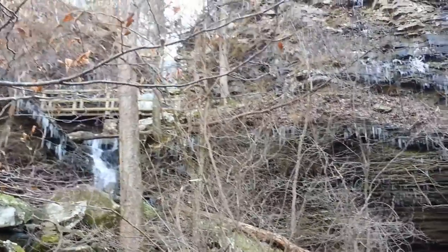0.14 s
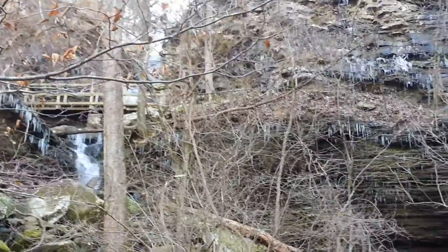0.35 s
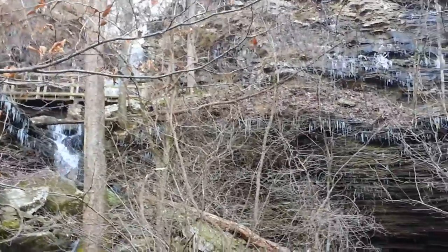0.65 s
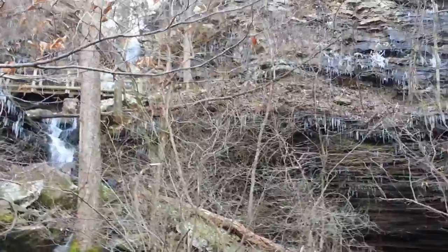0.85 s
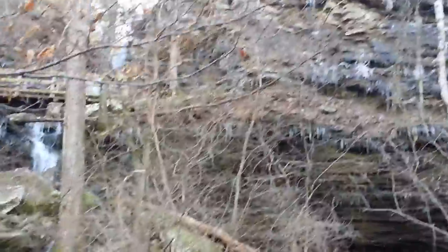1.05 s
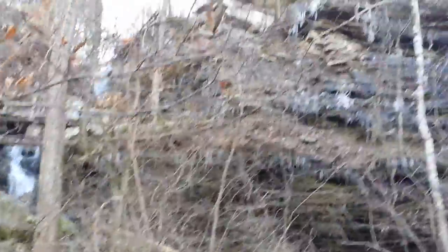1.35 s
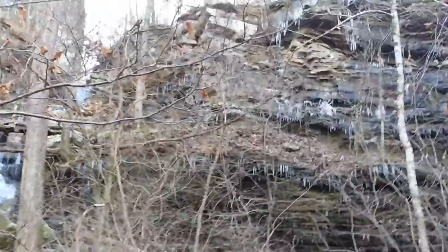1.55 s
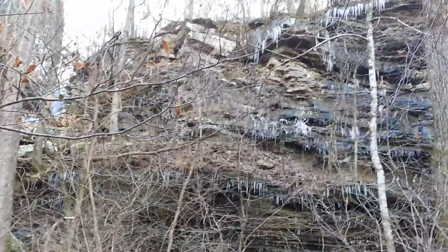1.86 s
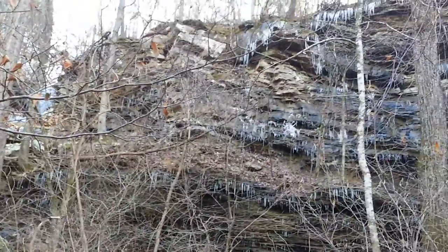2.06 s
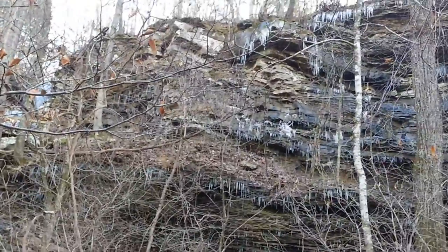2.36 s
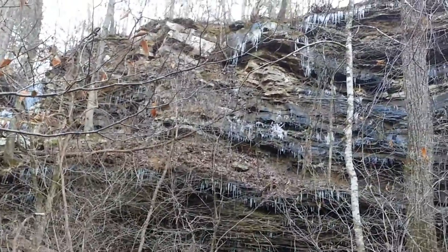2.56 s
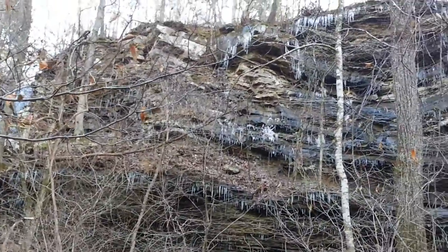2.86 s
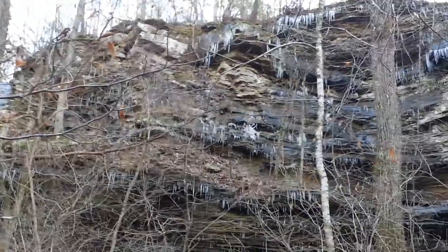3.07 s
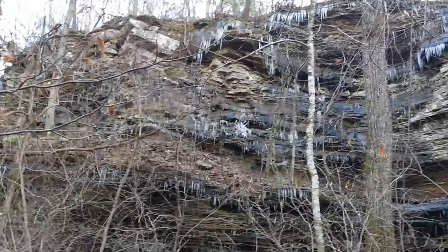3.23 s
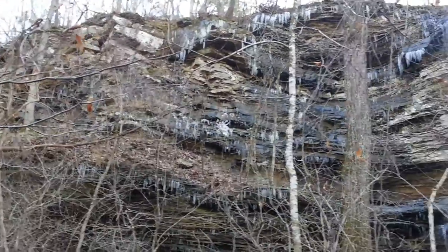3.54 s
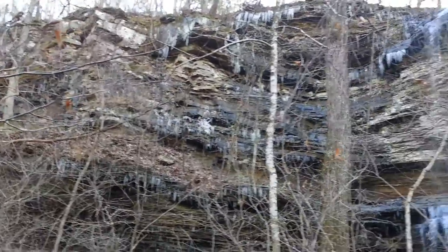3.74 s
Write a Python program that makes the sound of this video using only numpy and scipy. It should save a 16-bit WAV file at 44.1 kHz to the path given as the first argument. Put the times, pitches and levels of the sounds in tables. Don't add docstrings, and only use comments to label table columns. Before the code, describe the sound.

Steady waterfall rush under a rocky wooded bluff, with tiny drip ticks and light breeze thumps.

```python
import sys
import numpy as np
from scipy import signal
from scipy.fft import rfft, irfft, next_fast_len
from scipy.io import wavfile
from scipy.ndimage import uniform_filter1d

SR = 44100
rng = np.random.default_rng(int(sys.argv[2]) if len(sys.argv) > 2 else 0)


def store_pcm(level_fs):
    pcm = np.round(np.clip(level_fs, -1, 1) * 32767).astype(np.int16)
    wavfile.write(sys.argv[1], SR, np.atleast_2d(pcm).T)


def to_linear_factor(level_db):
    exponent = np.asarray(level_db, float) / 20
    return 10 ** exponent


N = 171990
SIZE = next_fast_len(N)
FREQ = np.arange(SIZE // 2 + 1) * SR / SIZE + 1e-3

# freq_hz, level_db (per Hz)
RUSH_TONE = [(55, -43), (120, -10), (200, -4.5), (400, -4.5), (900, -3), (1500, -1), (4000, -6),
             (15000, -14)]
# freq_hz, likeness (-1..1)
PORT_LIKENESS = [(200, 0.88), (650, 0.62), (1080, 0.12), (1460, 0.65), (1860, 0.54), (2130, -0.66),
                 (2500, -0.57), (4200, 0)]
# freq_hz, lead_rad
RIGHT_LEAD = [(0, 0), (700, 0.45), (1100, 2.7), (1400, 4), (2150, 4), (2500, 4), (3100, 6.5), (5000, 37.5)]
# time_s, level_db
BREEZE = [(0, -55), (.14, -47), (.19, -70), (1.45, -72), (1.66, -49), (1.9, -52.5), (2.15, -55),
          (2.35, -62), (2.45, -55), (2.6, -69), (2.75, -58), (3.2, -57.5), (3.4, -60), (3.65, -54),
          (3.9, -60)]
# peak_s, length_s, level_db
THUMPS = [
    (.13, 0.027, -51),
    (1.66, .06, -44.5),
    (1.8, 0.045, -41),
    (2.12, 0.046, -47),
]
# peak_s, length_s, level_db
PUFFS = [
    (.01, .04, -59),
    (.47, .04, -66),
    (.85, .04, -67),
    (1.28, 0.046, -46),
    (1.358, 0.077, -46.5),
    (1.52, 0.094, -48),
    (1.67, 0.067, -48),
    (2.447, 0.048, -48),
    (3.37, .04, -64),
]
WIND_CORNER = [
    [86],
    [60.4],
]
# peak_s, pitch_hz, length_ms, level_db, left_minus_right_db
DRIPS = [(.223, 6300, 1, -38, -3), (.231, 5600, 1, -29, 8), (1.474, 7000, 1, -30, -6),
         (1.487, 5300, 1, -26, 6), (1.683, 7100, 1.8, -29, -4), (1.7057, 5030, 1.3, -20, -2),
         (1.7495, 6900, 1.3, -27, -1), (1.863, 6800, .6, -29, -6), (2.005, 337, 17, -35, 2),
         (2.279, 6800, 1, -34, -6), (2.728, 6800, 1, -33, -6), (3.027, 5200, 1, -27, 6),
         (3.045, 5200, 1, -30, 6)]
# freq_hz, level_db
BODY_SHADE = [
    [(300, -0.5), (1850, 0.5), (2100, -5), (3100, -8.5), (4200, -3.5), (10500, -3), (12500, -13),
     (14400, -5.5)],
    [(300, -1.5), (1850, -0.5), (2100, -2.5), (2600, -5), (3800, -7), (8000, -0.5), (12500, -3.5),
     (14400, -17)],
]
# freq_hz, width_hz, boost_db
PORT_RINGS = [
    (5425, 1460, 13.5),
    (6695, 970, 19.5),
]


def curve(table, hz=FREQ):
    points = np.array(table, float)
    return np.interp(np.log(hz), np.log(points[:, 0]), points[:, 1])


def peak_db(hz, width_hz, db):
    return 10 * np.log10(1 + (to_linear_factor(db) ** 2 - 1) / (1 + (2 * (FREQ - hz) / width_hz) ** 2))


def unit(x):
    return x / np.sqrt(np.mean(x ** 2))


def walk(rate_hz):
    hold = int(SR / rate_hz)
    steps = np.repeat(rng.standard_normal(SIZE // hold + 1), hold)
    smooth = uniform_filter1d(uniform_filter1d(steps, hold), hold)
    return unit(smooth[:SIZE])


def rush():
    swell_db, surge_db, flicker_db = 0.1, 0.15, 0.45
    gurgle_hz = 900
    bubbles_per_cycle, bubble_spread_db, bubble_share = 0.5, 2.5, 0.2
    spectra = 0
    swell = walk(2.2)
    for hz in 40 * 2. ** np.arange(10):
        chance = rng.random((2, SIZE))
        loudness = to_linear_factor(bubble_spread_db * np.minimum(rng.exponential(size=(2, SIZE)), 4))
        size = loudness * rng.choice([-1, 1], (2, SIZE))
        pops = unit((chance < min(bubbles_per_cycle * hz / SR, 1)) * size)
        noise = rng.standard_normal((2, SIZE))
        mix = np.sqrt(bubble_share) * pops + np.sqrt(1 - bubble_share) * noise
        lumps_db = flicker_db * (1 + (gurgle_hz / hz) ** 0.75)
        gain = to_linear_factor(swell_db * swell + surge_db * walk(5.3) + lumps_db * walk(25.99))
        octave = np.cos(np.pi / 2 * np.clip(np.log2(FREQ / hz), -1, 1))
        spectra = spectra + rfft(mix * gain) * octave
    pool_boom = peak_db(240, width_hz=28, db=5)
    return spectra * to_linear_factor(curve(RUSH_TONE) + pool_boom)


def fall():
    left, other = rush()
    like = np.clip(curve(PORT_LIKENESS), -1, 1)
    lead_rad = np.interp(FREQ, *np.array(RIGHT_LEAD, float).T)
    right = like * np.exp(1j * lead_rad) * left + np.sqrt(1 - like ** 2) * other
    level_db = -30
    return unit(irfft(np.array([left, right]), SIZE)) * to_linear_factor(level_db)


def wind():
    t = np.arange(SIZE) / SR

    def bursts(rows):
        return sum(to_linear_factor(db) * np.exp(-(2 * (t - peak_s) / length_s) ** 2) for peak_s, length_s, db in rows)

    buffet_db = 4.5
    breeze = to_linear_factor(np.interp(t, *np.array(BREEZE).T) + buffet_db * walk(12))
    left = breeze + bursts(THUMPS)
    right = bursts(PUFFS)
    rumble = 1 / (1 + (FREQ / np.array(WIND_CORNER)) ** 4) ** 1.02
    colour = rumble / (1 + (45 / FREQ) ** 2) ** 2.0
    eddies = unit(irfft(rfft(rng.standard_normal((2, SIZE))) * colour, SIZE))
    eddies = eddies / np.sqrt(uniform_filter1d(eddies ** 2, 2500))
    return np.array([left, right]) * eddies


def drips():
    glide, lag_s = 0.066, 0.00042
    half = 900
    out = np.zeros((2, SIZE))
    t = np.arange(-half, half) / SR
    for peak_s, hz, length_ms, db, pan_db in DRIPS:
        middle = int(peak_s * SR)
        for ch, side in enumerate([1, -1]):
            local_s = t - side * lag_s / 2
            u = local_s / (length_ms / 2000)
            blip = np.exp(-u ** 2) * np.sin(2 * np.pi * hz * local_s * (1 + glide * u / 2))
            out[ch, middle - half:middle + half] += to_linear_factor(db + side * pan_db / 2) * blip
    return out


def scene():
    ports = np.array([to_linear_factor(curve(shade) + peak_db(*ring)) for shade, ring in zip(BODY_SHADE, PORT_RINGS)])
    water = irfft(rfft(fall() + drips()) * ports, SIZE)
    return (water + wind())[:, :N]


def roll_off(x):
    return signal.sosfilt(signal.butter(12, 14570, fs=SR, output="sos"), x)


def record(dry):
    return roll_off(dry)


dry = scene()
out = record(dry)
store_pcm(out)
```